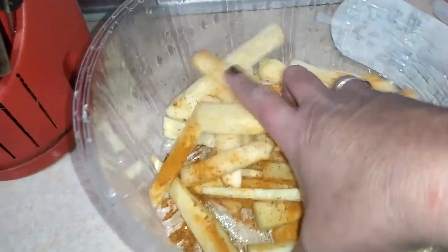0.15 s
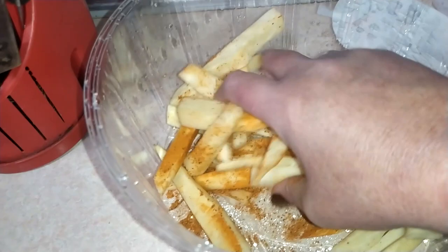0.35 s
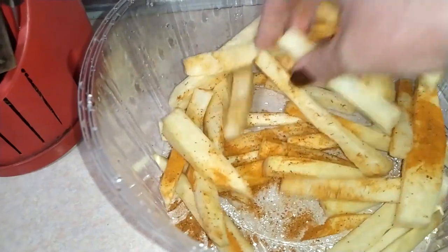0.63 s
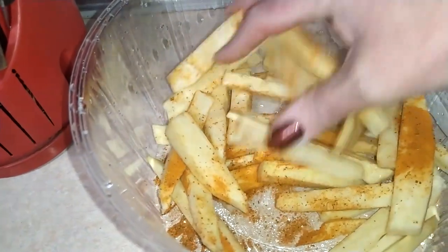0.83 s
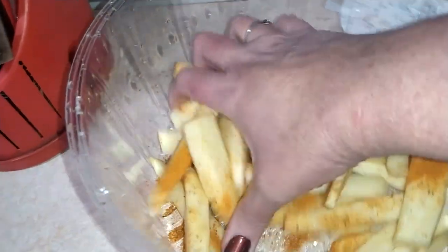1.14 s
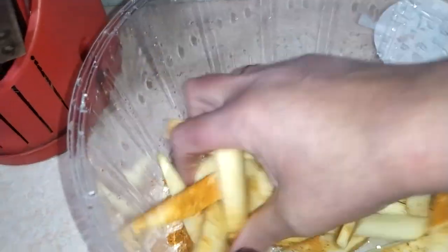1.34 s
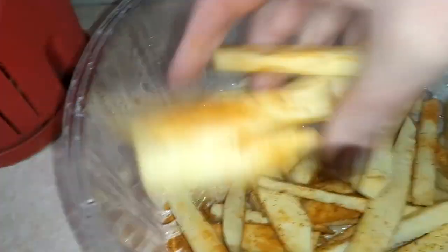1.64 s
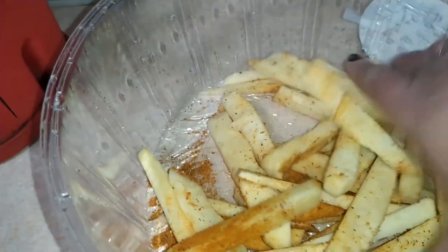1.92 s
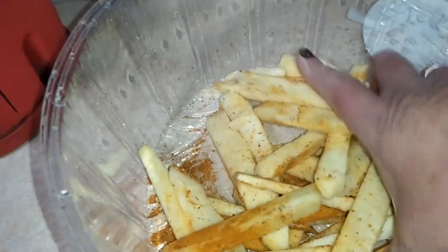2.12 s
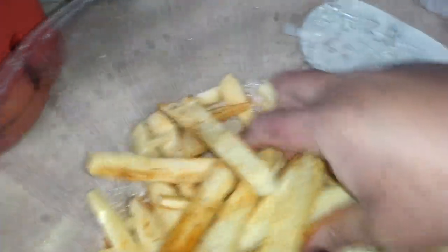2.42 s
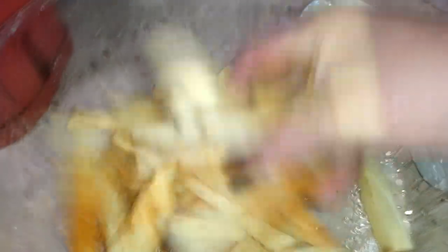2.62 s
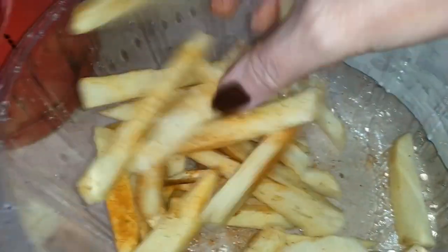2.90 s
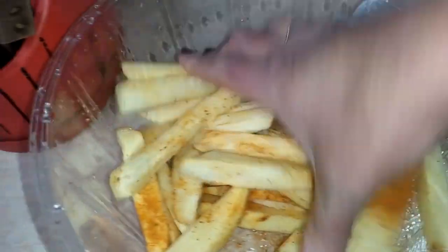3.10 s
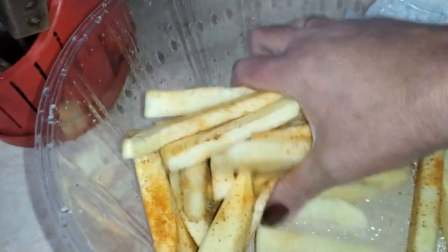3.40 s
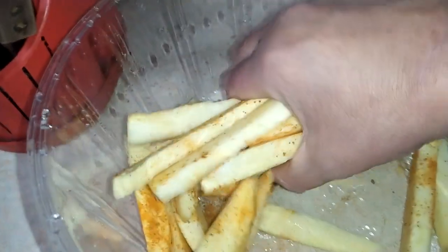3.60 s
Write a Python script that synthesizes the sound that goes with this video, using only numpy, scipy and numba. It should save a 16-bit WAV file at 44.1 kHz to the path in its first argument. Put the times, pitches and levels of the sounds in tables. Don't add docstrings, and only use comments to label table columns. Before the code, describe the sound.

Raw potato-like sticks are tossed by hand in a plastic tub: hollow thuds, woody clacks and dry rustling, sparser at first, then harder and denser. Close small microphone, short kitchen echo, loudest hits distorting.

```python
import sys
import numpy as np
from scipy import signal
from scipy.io import wavfile
from scipy.ndimage import uniform_filter1d
from numba import njit

SR = 44100
rng = np.random.default_rng(int(sys.argv[2]) if len(sys.argv) > 2 else 0)


def dump_mix(stems):
    frames = np.atleast_2d(stems).T
    limited = np.clip(frames, -1, 1)
    pcm = np.round(limited * 32767).astype(np.int16)
    wavfile.write(sys.argv[1], SR, pcm)


def gain_from_decibels(decibels):
    exponent = np.asarray(decibels, float) / 20
    return 10 ** exponent


N = 165375

# start_s, level_db, pitch_hz
TUB_THUDS = [(0.033, -13.5, 264), (0.1, -17.5, 218), (0.176, -11, 231), (0.21, -10.5, 348),
             (0.284, -19, 493), (0.313, -5.5, 215), (0.349, -16.5, 310), (0.437, -21, 156),
             (0.493, -8.5, 195), (0.545, -3.5, 208), (0.667, -19, 193), (0.715, -15.5, 354),
             (0.892, -10, 187), (0.935, -14.5, 305), (1.082, -9.5, 218), (1.12, -9.5, 394),
             (1.198, -7, 454), (1.29, -10.5, 417), (1.433, -9.5, 310), (1.514, 0, 213), (1.585, -25, 323),
             (1.672, -13, 210),
             (1.806, -9.5, 198), (1.889, -11.5, 292), (1.96, -20, 220), (2.04, -10.5, 408),
              (2.08, -22, 262), (2.272, 2.5, 346), (2.328, -1.5, 339), (2.35, 0, 355), (2.407, -5.5, 247),
              (2.538, -4.5, 363), (2.658, -11, 251), (2.752, -4, 344), (2.817, -9.5, 394),
              (2.923, -10, 335), (2.969, -10.5, 329), (3.013, -1, 324), (3.039, 3, 369), (3.057, -3.5, 367),
              (3.139, -6, 178), (3.158, -7, 391), (3.218, -5, 285), (3.267, -3.5, 300), (3.399, -2, 376),
              (3.503, -1, 366), (3.634, -7.5, 237)]
# start_s, level_db, pitch_hz, crack_treble_db
STICK_CLACKS = [(0.1763, -7, 717, -6), (0.2086, -9.5, 697, -15.5), (0.2858, -8, 853, -11),
                (0.3158, -3, 3130, -1.5), (0.4367, -21, 776, -6.5), (0.4893, -27, 1010, 0.5),
                (0.4994, -13.5, 640, -27), (0.5437, -9.5, 1030, -25), (0.6518, -22.5, 1970, -14),
                (0.7178, -24, 1150, -17), (0.826, -24, 820, -12), (0.934, -1.5, 657, -21.5),
                (1.0935, -8, 810, -17), (1.1182, -5.5, 1630, -26), (1.1467, -17, 740, -17),
                (1.1977, -8.5, 785, -17), (1.256, -6, 2030, -5), (1.297, 4, 1154, -10.5),
                (1.3367, -4.5, 883, -21), (1.4346, -23, 790, -5), (1.5166, -0.5, 740, -14),
                (1.593, -15.5, 1080, -7),
                (1.7877, -21, 750, -16), (1.8295, -10.5, 1090, -10), (1.8927, -9.5, 663, -7.5),
               (1.955, -8, 840, -12), (1.9844, -14.5, 824, -19), (2.041, -17, 1240, -13),
               (2.273, 6.5, 1810, -4), (2.3129, -4.5, 985, -6), (2.3501, -8.5, 793, -8.5),
               (2.4079, -17, 743, -4.5), (2.536, -8.5, 796, -9), (2.7517, -5.5, 800, -12),
               (2.9232, -1, 1810, -14.5), (3.0226, 2, 1150, -14), (3.101, -26.5, 1130, 10),
               (3.1608, -4.5, 743, -40), (3.268, -8, 730, -6.5), (3.3064, -4.5, 762, -19),
               (3.385, -5, 2750, -14), (3.4, -4.5, 730, -6.5), (3.4373, -5, 3700, -0.5),
               (3.4787, -6.5, 1760, -35), (3.5054, -16, 682, -27), (3.521, 1.5, 992, -10),
               (3.6268, -10.5, 737, -21), (3.636, -7, 766, -6)]
# start_s, length_s, rustle_db, weight_on_tub_db
HEAP_SLIDES = [(-.01, 0.13, -28.5, 0), (0.138, 0.11, -23, -2), (0.263, 0.092, -26, 3),
               (0.367, 0.051, -38, 7), (0.431, 0.15, -33.5, 6.5), (0.569, 0.21, -44.5, 14),
               (0.791, 0.17, -44.5, 9.5), (0.916, 0.083, -30.5, 9.5), (1.05, 0.078, -33, 4.5),
               (1.148, .06, -28.5, -0.5), (1.211, 0.17, -24.5, 2.5), (1.405, 0.12, -24.5, 5),
               (1.521, 0.15, -34, 9.5), (1.704, 0.015, -32.5, -7), (1.791, .06, -26, 10),
               (1.881, 0.051, -29.5, 5.5), (1.943, 0.11, -35, 6), (2.073, 0.048, -29, 9),
               (2.141, 0.12, -37, 5.5), (2.247, 0.148, -21, -2.5), (2.402, 0.091, -24.5, 1.5),
               (2.501, 0.099, -21.5, 1.5), (2.615, 0.12, -30.5, 6.5), (2.737, 0.12, -27, 9),
               (2.918, 0.074, -25.5, 12.5), (3.004, 0.099, -25, 8), (3.125, 0.19, -23, 5.5),
               (3.336, 0.1, -31.5, 11), (3.376, .17, -25, 7.5), (3.571, 0.11, -31, 4),
               (3.689, .08, -24.5, 0.5)]
# mode_hz, level_db, t60_s
TUB_MODES = [(98, -12, 0.1), (152, -7.5, 0.059), (198, -1.5, 0.067), (244, -6, 0.12), (318, -5.5, 0.071),
             (363.5, -4.5, 0.13), (394, -3.5, 0.073), (463, -12, 0.08), (633, -14.5, 0.059),
             (816, -6, 0.035), (1150, -7.5, 0.048)]
# freq_hz, density_db_per_hz
RUSTLE_COLOUR = [(500, -1), (1200, -8), (2000, -7), (4000, -11.5), (8000, -10)]
# start_s, level_db, pitch_hz, t60_s
STICK_KNOCKS = [(0.033, -26, 720, 0.03), (0.097, -29, 452, 0.03), (0.142, -28, 710, 0.027),
                (0.441, -18, 785, 0.039), (0.483, -23, 775, 0.033), (0.499, -6, 670, 0.032),
                (0.505, -12, 636, 0.03), (0.554, -17, 444, 0.03), (0.577, -11.5, 740, 0.043),
                (0.611, -19.5, 719, 0.038), (0.893, -25, 460, 0.03), (1.063, -20, 452, 0.03),
                (1.122, -8, 832, 0.046), (1.198, 3.5, 831, 0.03), (1.291, -7, 526, 0.026),
                (1.434, -8.5, 832, 0.042), (1.522, -1, 1093, 0.026), (1.672, -24, 452, 0.03),
                (1.801, -23, 452, 0.03), (2.081, -13.5, 1170, 0.025), (2.245, -13.5, 1820, 0.019),
                (2.332, -7, 460, 0.03), (2.342, -15.5, 450, 0.03), (2.354, -2.5, 794, 0.03),
                (2.408, -7, 710, 0.035), (2.415, -8, 627, 0.034), (2.757, -9, 790, 0.03),
                (2.801, -17, 452, 0.035), (2.969, -9.5, 503, 0.036), (3.035, -4, 452, 0.027),
                (3.044, -1.5, 1084, 0.041), (3.086, -10, 463, 0.03), (3.128, -9.5, 859, 0.035),
                (3.221, -7, 526, 0.03), (3.405, -5, 1080, 0.025), (3.504, -3.5, 681, 0.027),
                (3.537, -5, 1070, 0.03), (2.5425, -4, 470, 0.023)]
# start_s, level_db, centre_hz, t60_s
WET_SNAPS = [(0.8789, -26.5, 2780, 0.02), (1.046, -27, 5600, 0.02), (1.256, -3, 2680, 0.015),
             (1.483, -10.5, 7200, 0.015), (2.2824, 0.5, 2750, 0.015), (2.3506, -9, 3750, 0.013),
             (2.3564, -7.5, 6350, 0.027), (2.5037, -10, 2930, 0.013), (2.5444, -20, 4000, 0.015),
             (3.0694, -19, 5900, 0.013), (3.0924, -9, 7540, 0.015), (3.1388, -19, 2760, 0.012),
             (3.2375, -14, 2770, 0.014), (3.4062, -9, 2510, 0.015), (3.4241, -2, 6600, 0.016),
             (3.4372, 1.5, 5960, .014), (3.4664, -11, 2750, 0.015), (3.5224, -5.5, 2630, 0.015),
             (3.6152, -10.5, 7100, 0.014)]


@njit
def grains(n, at, hz, t60, size):
    out = np.zeros(n)
    for k in range(len(at)):
        turn = np.exp(2j * np.pi * hz[k] - np.log(1000.) / t60[k])
        z = size[k] + 0j
        for i in range(max(int(at[k]), 0), min(int(at[k] + t60[k]), n)):
            out[i] += z.imag
            z *= turn
    return out


def ring(start_s, hz, t60_s, size):
    arrays = np.broadcast_arrays(start_s, hz, t60_s, size)
    start_s, hz, t60_s, size = (1. * v.ravel() for v in arrays)
    return grains(N, start_s * SR, np.clip(hz, 20, SR / 2.5) / SR, np.maximum(t60_s, 1e-3) * SR, size)


def unit(x):
    return x / np.sqrt(np.mean(x ** 2))


def band(x, lo_hz, hi_hz):
    return signal.sosfilt(signal.butter(2, [lo_hz, hi_hz], "band", fs=SR, output="sos"), x)


def noise(lo_hz, hi_hz):
    return unit(band(rng.standard_normal(N), lo_hz, hi_hz))


def fade(start_s, db, t60_s):
    kicks = np.zeros(N)
    at = np.clip(start_s * SR, 0, N - 1).astype(int)
    np.add.at(kicks, at, gain_from_decibels(db))
    return signal.lfilter([1], [1, -gain_from_decibels(-60 / (t60_s * SR))], kicks)


def walk(rate_hz):
    hold = int(SR / rate_hz)
    steps = np.repeat(rng.standard_normal(N // hold + 1), hold)
    return unit(uniform_filter1d(steps, hold)[:N])


def drum(start_s, db):
    mode_spread, scatter_db = 0.043, 3
    hz, mode_db, t60_s = np.array(TUB_MODES).T
    c = rng.standard_normal((len(start_s), 3, len(TUB_MODES)))
    size = gain_from_decibels(db[:, None] + mode_db + scatter_db * c[:, 2])
    return ring(start_s[:, None], hz * (1 + mode_spread * c[:, 0]), t60_s, np.sign(c[:, 1]) * size)


def thuds():
    tumble_s, thud_db, bounce_db = 0.02, -9, -5.5
    pitch_db, pitch_t60_s = 6, 0.075
    start_s, db, hz = np.array(TUB_THUDS).T
    late = np.sort(rng.random((len(start_s), 5)), axis=1)
    late[:, 0] = 0
    at_s = start_s[:, None] + late * tumble_s
    blow_db = db[:, None] + thud_db + bounce_db * (late > 0)
    pitched = ring(at_s, hz[:, None], pitch_t60_s, gain_from_decibels(blow_db + pitch_db))
    return drum(at_s.ravel(), blow_db.ravel()) + pitched


def crack(start_s, db, treble_db):
    attack_t60_s, split_hz = 7 * 0.00057, 2650
    mid_db, mid_t60_s = -8.5, 0.069
    top_db, top_t60_s = 1, 0.038

    def burst(level_db, t60_s):
        return fade(start_s, level_db, t60_s) - fade(start_s, level_db, attack_t60_s)

    mid = noise(700, split_hz) * burst(db + mid_db, mid_t60_s)
    top = noise(split_hz, 8040) * burst(db + treble_db + top_db, top_t60_s)
    return mid + top


def clacks():
    stick_cycles, stick_db = 23.5, -3.5
    over_db, over_scatter_db, over_spread, scuff_s = -11 - 4.5, 3.9, 0.487, 0.012
    start_s, db, hz, treble_db = np.array(STICK_CLACKS).T
    c = rng.standard_normal((len(start_s), 2, 14))
    late = rng.random((len(start_s), 14))
    over_hz = hz[:, None] * np.exp(over_spread * c[:, 0])
    over_size = gain_from_decibels(db[:, None] + over_db + over_scatter_db * c[:, 1])
    overtones = ring(start_s[:, None] + scuff_s * late ** 2, over_hz, stick_cycles / over_hz, over_size)
    stick = ring(start_s, hz, stick_cycles / hz, gain_from_decibels(db + stick_db) * np.minimum(800 / hz, 1))
    return stick + overtones + crack(start_s, db, treble_db)


def knocks():
    knock_db, side_db, side_spread = -5, -8, 0.34
    start_s, db, hz, t60_s = np.array(STICK_KNOCKS).T[:, :, None]
    side_hz = 1.5 * hz * np.exp(side_spread * rng.standard_normal((len(start_s), 3)))
    main = ring(start_s, hz, t60_s, gain_from_decibels(db + knock_db))
    return main + ring(start_s, side_hz, 1.1 * t60_s, gain_from_decibels(db + knock_db + side_db))


def snaps():
    snap_db, snap_spread, bunch_s = -9, 0.3, 0.0017
    start_s, db, hz, t60_s = np.array(WET_SNAPS).T[:, :, None]
    c = rng.standard_normal((len(start_s), 8))
    late_s = bunch_s * rng.random((len(start_s), 8))
    return ring(start_s + late_s, hz * np.exp(snap_spread * c), t60_s, gain_from_decibels(db + snap_db))


def rustle_ticks():
    ticks_per_s, tick_cycles, spread_db, flicker_db = 12000, 5.7 * 7, 2.5, 2.5
    when, pitch, strength = rng.random((int(N / SR * ticks_per_s), 3)).T
    hz = 500 * 17. ** pitch
    walks = np.array([walk(45) for _ in range(4)])
    flicker = walks[(pitch * 4).astype(int), (when * N).astype(int)]
    colour_hz, colour_db = np.array(RUSTLE_COLOUR).T
    db = np.interp(np.log(hz), np.log(colour_hz), colour_db)
    db += 20 * np.log10(hz) - spread_db * np.log(strength)
    return unit(ring(when * N / SR, hz, tick_cycles / hz, gain_from_decibels(db + flicker_db * flicker)))


def tub_jolts():
    jolts_per_s, spread_db = 300, 2
    when, strength = rng.random((int(N / SR * jolts_per_s), 2)).T
    return unit(drum(when * N / SR, -spread_db * np.log(strength)))


def heap():
    edge_s, settle_t60_s, rustle_waver_db = 0.013, 0.11, 1.5
    t = np.arange(N) / SR
    rustle, weight = 0, 0
    for start_s, length_s, db, weight_db in HEAP_SLIDES:
        swell = np.clip((t - start_s) / edge_s, 0, 1)
        slide = swell * gain_from_decibels(-60 * np.maximum(t - start_s - length_s, 0) / settle_t60_s)
        rustle = rustle + slide * gain_from_decibels(db)
        weight = weight + slide * gain_from_decibels(db + weight_db)
    return rustle * rustle_ticks() * gain_from_decibels(rustle_waver_db * walk(40)) + weight * tub_jolts()


def kitchen(near):
    t60_s, echo_db, gap_s = 0.2, -17, 0.006
    t = np.arange(SR // 2) / SR
    echo = band(rng.standard_normal(len(t)), 150, 6500) * gain_from_decibels(-60 * t / t60_s) * (t > gap_s)
    echo = echo / np.sqrt(np.sum(echo ** 2))
    return gain_from_decibels(echo_db) * signal.fftconvolve(near, echo)[:N]


def room_noise():
    hush_db, rumble_db = -56.5, -35.5
    return gain_from_decibels(hush_db) * noise(200, 3500) + gain_from_decibels(rumble_db) * noise(42, 97)


def scene():
    near = thuds() + clacks() + knocks() + snaps() + heap()
    return (near + kitchen(near) + room_noise())[None]


def roll_off(x):
    return signal.sosfilt(signal.butter(12, 15900, fs=SR, output="sos"), x)


def record(dry):
    low_cut_hz, top_hz, drive_db, ceiling = 60.4, 7900, -1.5, 0.97
    x = signal.sosfilt(signal.butter(3, low_cut_hz, "high", fs=SR, output="sos"), dry)
    x = signal.sosfilt(signal.ellip(8, 0.3, 80, top_hz, fs=SR, output="sos"), x)
    mix = np.clip(x * gain_from_decibels(drive_db), -ceiling, ceiling) / ceiling
    return roll_off(mix)


dry = scene()
out = record(dry)
dump_mix(out)
```